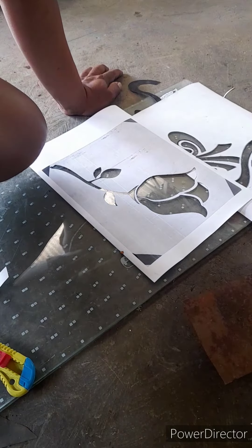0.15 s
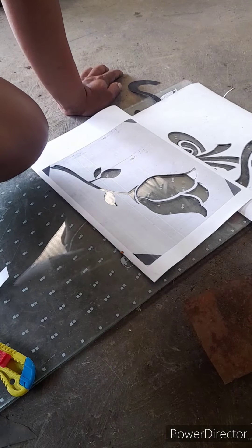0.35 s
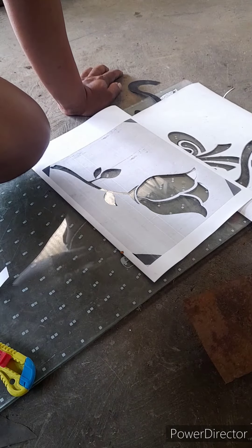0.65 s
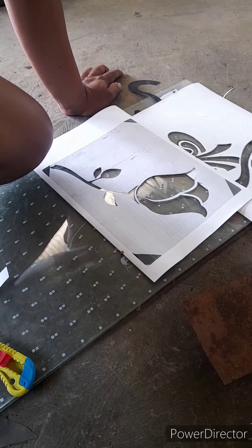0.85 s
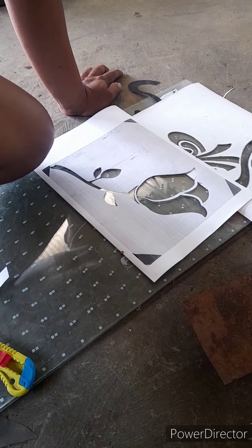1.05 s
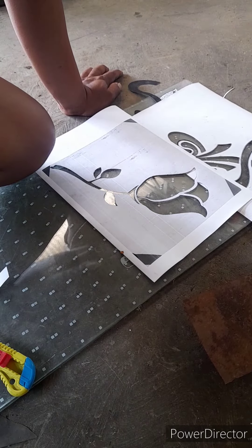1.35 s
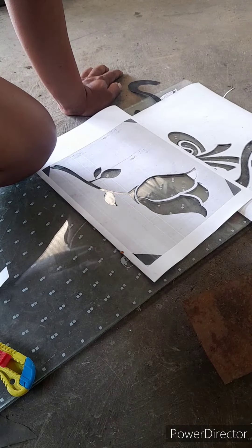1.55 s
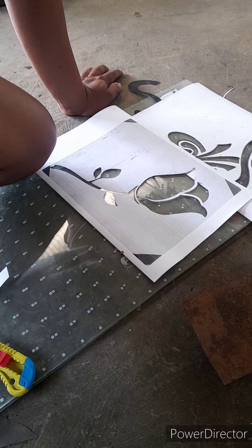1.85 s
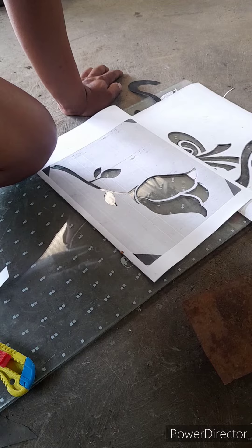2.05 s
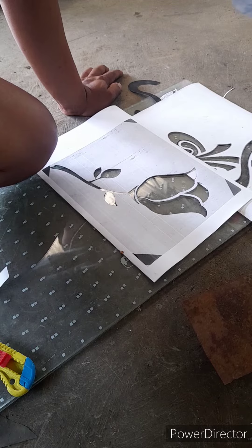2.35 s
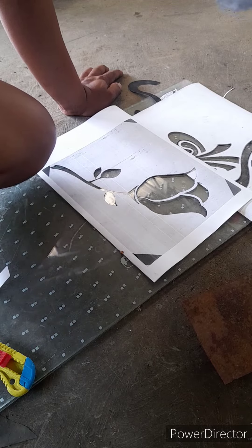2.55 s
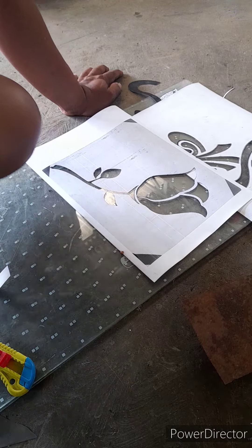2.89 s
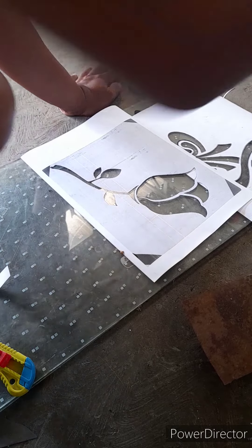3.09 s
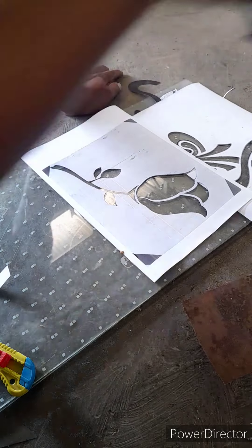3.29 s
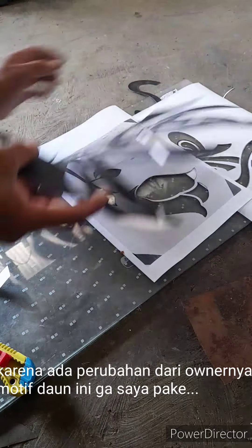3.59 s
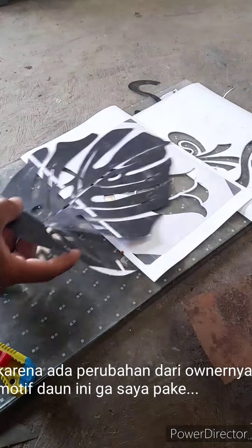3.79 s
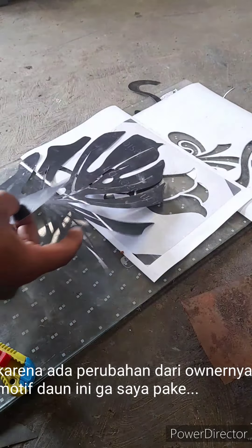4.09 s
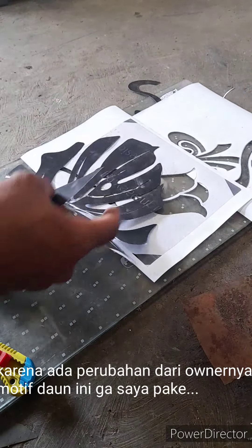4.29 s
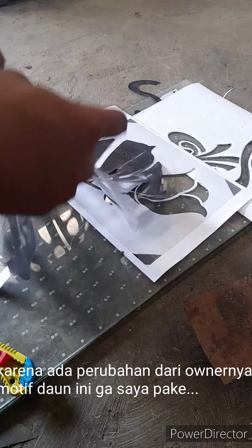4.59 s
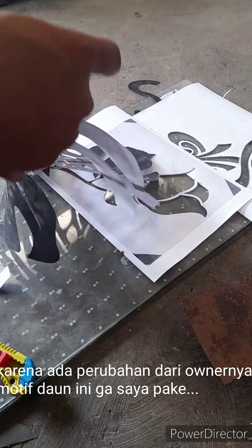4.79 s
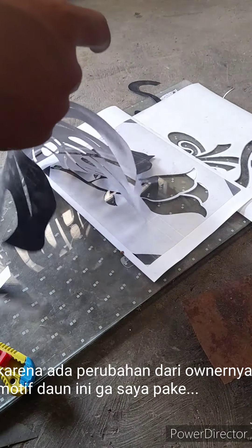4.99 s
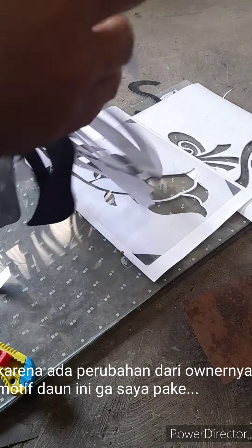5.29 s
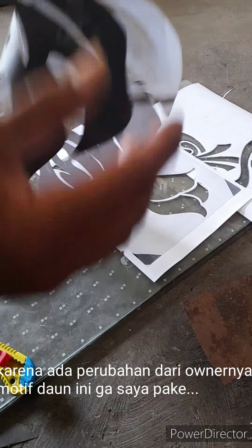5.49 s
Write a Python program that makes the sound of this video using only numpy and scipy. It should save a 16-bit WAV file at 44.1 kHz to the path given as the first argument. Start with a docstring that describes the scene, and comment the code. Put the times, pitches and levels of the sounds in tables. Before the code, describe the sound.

A small single-cylinder engine drones outside an open workshop, throbbing low with airy rush, valve chatter and faint dry squeaks. Close to the microphone, cloth and paper rub lightly; around three seconds a stiff cut-out sheet slides off in two firm scrapes. The engine then drops in pitch, fires unevenly and draws away, leaving soft paper flicks over a quiet low street background.

```python
"""First a single-cylinder engine putters outside an open workshop, then slows and fires unevenly as it
draws away: harmonics of the firing rate lifted by moving pipe resonances, with noisy rush and clatter.
Close by, someone crouching on the floor shifts, slides a cut paper stencil off a stack and waves it about:
friction noise hisses and crinkles, struck resonances tick. A quiet street of coloured noise lies behind."""
import sys
import numpy as np
from scipy import signal
from scipy.fft import rfft, irfft
from scipy.io import wavfile
from scipy.ndimage import map_coordinates

SR = 44100
rng = np.random.default_rng(int(sys.argv[2]) if len(sys.argv) > 2 else 0)


def wrap_up_sound(samples):
    """Save the sound to the file named by the first command line argument, as 16-bit audio."""
    columns = np.atleast_2d(samples).T
    # keep every value between -1 and 1, then stretch to whole-number steps
    tamed = np.clip(columns, -1, 1)
    steps = np.round(tamed * 32767).astype(np.int16)
    wavfile.write(sys.argv[1], SR, steps)


N = 248724
TIME = np.arange(N) / SR

# nearness of the machine, as the nominal level of its rush: [t/s, level/dB]
NEARNESS = [(0, -50), (.4, -45.5), (.8, -42.5), (1.3, -43.5), (1.8, -49), (3.1, -51), (3.9, -54),
            (5.64, -64.5)]


def engine():
    """Source superposition: periodic exhaust puffs, with rush and valve noise modulated at the firing rate."""
    rate, cycles, strength = crank(jitter_s=.0005, uneven_db=1.5, skip_db=1.2, first_s=0.00093)
    rush_db, = in_time(NEARNESS)
    puffs = strength * exhaust(rate, cycles, rush_db, ring_hz=161.64, ring_width_hz=103,
                               turn=1.35, scatter_hz=406)
    throb = np.cos(2 * np.pi * (cycles - .15))  # peaks 0.15 cycle after each firing
    rush = machine_rush(rush_db, throb) * pan(left_db=-0.3)
    gear = (valve_clatter(rush_db, throb) + squeaks(waver_hz=36)) * pan(left_db=-3.0)
    return workshop(puffs * pan(left_db=-2.2), wet_db=-24) + workshop(rush + gear, wet_db=-13.5)


# engine speed: [t/s, firing rate f/Hz]
FIRING = [(0, 28.24), (.35, 28.03), (.6, 27.45), (1, 27.38), (1.35, 27.66), (2.1, 27.42), (2.6, 27.79),
          (3.15, 27.7), (3.75, 25.85), (4.05, 25.1), (4.48, 23.2), (4.8, 23.03), (5.19, 24.57),
          (5.36, 22.64), (5.64, 23.36)]
# uneven running: [t/s, roughness 0-1]
ROUGH = [(0, .7), (.45, .5), (.8, .13), (3.1, .13), (3.6, .2), (4.1, .5), (4.8, .45), (5.1, .35),
         (5.64, .5)]


def crank(jitter_s, uneven_db, skip_db, first_s):
    """Phase is the integral of frequency; rough firings stray in time and alternate strong and weak."""
    (rate,), (rough,) = in_time(FIRING), in_time(ROUGH)
    cycles = np.cumsum(rate) / SR - first_s * rate[0]
    firing = np.arange(int(cycles[-1]) + 2)
    early, strong = rng.standard_normal((len(firing), 2)).T
    strength_db = uneven_db * strong + skip_db * (-1) ** firing
    cycles = cycles + rough * rate * jitter_s * np.interp(cycles, firing, early)
    return rate, cycles, from_db(rough * np.interp(cycles, firing, strength_db))


# limping, every second firing differs: [t/s, nominal power of half-order tones relative to the harmonics]
LIMP = [(0, .15), (.55, .15), (.75, 0), (4.2, 0), (4.45, 2), (4.6, 5), (4.92, 5), (5.02, .15), (5.64, .1)]
LIMP_WIDTH_HZ = 28.4  # reach of the limping either side of the drone
# body of the exhaust puff between the resonances: [f/Hz, harmonic level above the nominal rush/dB]
PUFF = [(52, -5.5), (80, -5), (110, -6), (190, -9), (250, -15), (280, -37), (380, -23), (450, -17),
        (550, -15.5), (640, -28), (715, -12), (850, -80)]
# how far the exhaust arrives by scattered paths rather than straight: [t/s, share 0-1]
INDIRECT = [(0, .6), (.55, .55), (.78, .08), (1.15, .1), (1.5, .15), (1.75, .55), (2.2, .45), (2.38, .15),
            (2.95, .12), (3.3, .35), (3.6, .4), (3.8, .25), (4.7, .25), (4.95, .55), (5.4, .35)]
# the beat comes early or late as straight and reflected paths trade places: [t/s, lag/s]
ARRIVAL = [(0, .002), (.7, .002), (1.1, .0005), (1.62, -.004), (1.8, -.019), (2.2, -.021), (2.4, -.0245),
           (2.7, -.0235), (3.0, -.028), (3.15, -.033), (3.35, -.05), (3.7, -.054), (4.15, -.045),
           (4.35, -.045), (4.6, -.053), (5.1, -.055), (5.64, -.053)]
FADE_DB, FADES_PER_S = 3, 4  # upper harmonics swell and fade as the paths change
FADE_FROM_HZ, SPREAD_HZ = 290, 485  # fading and left-right phase difference are full above these


def exhaust(rate, cycles, rush_db, ring_hz, ring_width_hz, turn, scatter_hz):
    """Fourier synthesis: firing-rate harmonics lifted by pipe resonances, whose lag makes each puff ring on."""
    orders = np.r_[2:31, 2.5:11][:, None]
    coarse = TIME[::64]  # slow curves are worked out every 64 samples
    hz = orders * rate[::64]
    halfway = orders % 1 > 0
    limp = np.interp(coarse, *np.transpose(LIMP)) * np.exp(-((hz - ring_hz) / LIMP_WIDTH_HZ) ** 2)
    present = np.where(halfway, limp, 1)
    power = present * from_db(at_hz(PUFF, hz) + rush_db[::64]) ** 2 + pipe_power(hz, present)
    fading = np.array([drift(FADES_PER_S)[::64] for _ in orders])
    fading *= np.minimum(hz / FADE_FROM_HZ, 1) ** 2
    heights = np.sqrt(2 * power) * from_db(FADE_DB * fading)
    # scattered paths put the harmonics out of step, the high ones most: the beat melts into a drone
    indirect = np.interp(coarse, *np.transpose(INDIRECT))
    scatter = np.minimum(indirect + (hz / scatter_hz) ** 4 + halfway, 1)
    lags = turn * np.arctan(2 * (hz - ring_hz) / ring_width_hz)
    lags += scatter * rng.uniform(-np.pi, np.pi, orders.shape)
    arrival = np.interp(coarse, *np.transpose(ARRIVAL))
    lags += 2 * np.pi * np.minimum(hz - ring_hz, ring_hz) * arrival
    # the higher a harmonic, the more its phase differs between the two sides
    apart = np.minimum((hz / SPREAD_HZ) ** 2, 1) * rng.choice([-1, 1], orders.shape) * np.pi / 4

    def tone(k, height, lag):
        phase = 2 * np.pi * k * cycles - np.interp(TIME, coarse, lag)
        return np.interp(TIME, coarse, height) * np.cos(phase)

    return np.array([sum(tone(*row) for row in zip(orders, heights, lags + side * apart))
                     for side in (1, -1)])


# four exhaust resonances move and swell as the engine travels, each: [t/s, centre f/Hz, level/dB]
RUMBLE = [(0, 105, -41), (.14, 84, -35), (.46, 110, -37), (.7, 99, -34), (1.05, 103, -28.5),
          (1.3, 110, -33.5), (1.7, 106, -33), (1.82, 94, -41), (1.96, 104, -35.5), (2.35, 110, -40),
          (2.8, 110, -34), (3.15, 94, -49), (3.68, 94, -45), (3.8, 86, -34), (3.93, 92, -35),
          (4.06, 86, -28.5), (4.16, 97, -31.5), (4.3, 87, -27), (4.42, 80, -39), (4.5, 88, -31),
          (4.86, 92, -32), (5.24, 100, -41), (5.32, 93, -35.5), (5.62, 93, -38)]  # deep, takes over off the throttle
DRONE = [(0, 149, -37), (.27, 162, -34.5), (.44, 143, -37), (.62, 138, -44), (1, 150.8, -25),
         (1.28, 149, -26.5), (1.48, 155, -21.5), (1.68, 162, -28), (1.86, 165, -26.5), (2.08, 161, -31),
         (2.2, 163, -37), (2.36, 168, -28.5), (2.56, 151, -31.5), (2.84, 161, -23.5), (3.1, 150, -27.5),
         (3.26, 138, -34), (3.42, 154.7, -27.5), (3.64, 151.7, -27.5), (3.75, 150, -32.5), (3.82, 164, -27),
         (4.1, 160, -29.5), (4.4, 158, -42), (4.6, 160, -35), (5.02, 157, -33.5), (5.3, 155, -39),
         (5.62, 146, -36.5)]  # main drone of the pipe
UPPER_BASS = [(0, 211.7, -43.5), (.5, 210, -44), (.8, 200, -30), (.92, 213, -29), (1.06, 219, -30),
              (1.22, 207.5, -40), (1.58, 216, -31.5), (1.9, 216, -45.5), (2.14, 195, -37.5),
              (2.24, 199, -42), (2.44, 205, -32.5), (2.58, 217, -42.5), (2.8, 206.2, -36),
              (3.05, 202, -41.5), (3.5, 207, -49), (3.7, 218, -36.5), (3.95, 225, -38), (4.1, 216, -49),
              (4.37, 206, -53), (4.45, 219, -38.5), (4.75, 203, -42), (5.62, 198.5, -46.5)]  # just above the drone
HUM = [(0.0, 328, -55.5), (0.16, 330, -47.5), (0.46, 304, -48), (0.84, 326, -54.9), (0.88, 299, -48.5),
       (1.14, 316, -50), (1.24, 307, -40), (1.96, 331, -51), (2.16, 303, -44), (2.42, 350, -42.5),
       (2.68, 317, -49.5), (3.3, 305, -51), (3.76, 306, -56), (5.62, 310, -69)]  # highest, faint
RUMBLE_WIDTH_HZ, DRONE_WIDTH_HZ, UPPER_BASS_WIDTH_HZ, HUM_WIDTH_HZ = 54, 37, 41, 63


def pipe_power(hz, present):
    """Additivity of power: four resonances each contribute to every tone."""
    return (resonance(hz, present, RUMBLE, RUMBLE_WIDTH_HZ)
            + resonance(hz, present, DRONE, DRONE_WIDTH_HZ)
            + resonance(hz, present, UPPER_BASS, UPPER_BASS_WIDTH_HZ)
            + resonance(hz, present, HUM, HUM_WIDTH_HZ))


def resonance(hz, present, curve, width_hz):
    """Selective resonance: a moving peak shares its power among the tones nearest to its centre."""
    centre_hz, db = (column[::64] for column in in_time(curve))
    lift = present / (1 + (2 * (hz - centre_hz) / width_hz) ** 2) ** 4
    return from_db(db) ** 2 * lift / lift.sum(axis=0)


# spectrum of the machine's rush: [f/Hz, relative level per Hz/dB]
RUSH = [(200, -6), (280, 3.5), (420, 4.5), (560, 2), (750, -0.5), (1000, -2), (1500, -5.5), (2600, -13),
        (4000, -17), (7000, -26.5), (15000, -48)]


def machine_rush(rush_db, throb):
    """Amplitude-modulated broadband noise: the rush throbs with each firing and drifts slowly."""
    noise = coloured(rng.standard_normal((2, N)), RUSH)
    return noise * from_db(rush_db + 1.22 + 0.26 * throb + drift(4.0))


# valve gear resonances: [f/Hz, width/Hz, relative level/dB]
VALVES = [(1610, 94, 0.5), (2023, 180, 7), (2255, 330, 15), (2600, 130, 4.5)]
# spells of louder chirring: [start t/s, strongest t/s, end t/s, level/dB]
CHIRRS = [(.08, .36, .56, -48), (.76, 1.0, 1.4, -49.5), (1.35, 1.55, 1.86, -53)]
CLATTER_DB = -11.5  # steady valve clatter, relative to the nominal rush


def valve_clatter(rush_db, throb):
    """Forced resonance: throbbing noise excites the damped modes of the valve gear."""
    knocks = rng.standard_normal((2, N)) * from_db(0.61 * throb)
    clatter = 0
    for hz, width_hz, db in VALVES:
        t60 = np.log(1000) / np.pi / width_hz
        clatter = clatter + from_db(db) * rms_one(ring(knocks, hz, t60)) * from_db(2.5 * drift(14))
    chirring = np.sqrt(from_db(rush_db + CLATTER_DB) ** 2 + swells(CHIRRS, shape=0.71))
    return patchy(clatter, patchy_db=3.0, width_hz=129.5, per_s=14) * chirring


# dry squeaks of the machine: [start t/s, end t/s, f/Hz, peak amplitude level/dB]
SQUEAKS = [(.172, .245, 2330, -49), (.174, .285, 1955, -54), (.19, .31, 2650, -55), (.325, .37, 2030, -51),
           (.388, .447, 2040, -45), (.44, .535, 2030, -49.5), (1.07, 1.21, 2062, -55),
           (1.546, 1.674, 1704, -53)]


def squeaks(waver_hz):
    """Frequency modulation: short wavering tones swell and fade."""
    waver = waver_hz * drift(110)
    total = 0
    for start, end, hz, db in SQUEAKS:
        swell = np.sin(np.pi * np.interp(TIME, [start, end], [0, 1]))
        total = total + from_db(db) * swell * np.sin(2 * np.pi * np.cumsum(hz + waver) / SR)
    return total


# where the paper is: [t/s, left minus right level/dB]
PAPER_SIDE = [(0, -.7), (2.8, -.8), (3.05, -4.8), (3.5, -4.8), (3.9, -.4), (5.64, 0)]
# firm slides of the sheet: [start t/s, end t/s, coarse voice nominal level/dB, hiss nominal level/dB]
SLIDES = [(2.977, 3.078, -50, -52.5), (3.036, 3.191, -39, -40), (3.317, 3.428, -39.5, -40),
          (3.37, 3.514, -36, -37.5), (5.005, 5.066, -53, -51.5)]


def paper():
    """Friction noise: light rubbing is a thin hiss; firm slides add the coarse voice of the whole sheet."""
    side_db, = in_time(PAPER_SIDE)
    coarse, hiss = sum(from_db([[coarse_db], [hiss_db]]) * pressure(start, end)
                       for start, end, coarse_db, hiss_db in SLIDES)
    sheet = rub(hiss) + slide(coarse) + whisk() + flexing(t60=0.009)
    return workshop(sheet * pan(side_db), wet_db=-24.0)


# light rubs of paper and cloth: [start t/s, strongest t/s, end t/s, nominal level/dB]
RUBS = [(.08, .3, 1.7, -59.5), (.35, .41, .48, -54.5), (.6, .98, 2.7, -57), (1.26, 1.31, 1.34, -47),
        (1.49, 1.56, 1.704, -48), (1.68, 1.78, 1.85, -63), (1.92, 1.96, 1.88, -47.5),
        (2.26, 2.55, 2.8, -57.5), (2.42, 2.62, 2.82, -51.5), (2.82, 2.87, 6.2, -61), (3.04, 3.2, 4, -57),
        (3.36, 3.62, 3.75, -46.5), (3.6, 4.23, 4.37, -55.5), (3.92, 3.965, 4, -54), (3.99, 4.05, 4.08, -54),
        (4.38, 4.56, 4.62, -59), (4.71, 4.79, 4.85, -58), (5.01, 5.04, 5.37, -56.5),
        (5.06, 5.14, 5.15, -50.5), (5.27, 5.36, 5.52, -49)]
# their spectrum: [f/Hz, relative level per Hz/dB]
RUB_COLOUR = [(700, -3.5), (1500, 1), (2300, -1), (3500, 3), (5500, 2.5), (7500, 2), (9000, -1),
              (12500, 3.5), (15500, -5.5)]
RESTING_RUB_DB = -70.5  # nominal level: hands and clothes are never quite still


def rub(hiss):
    """Light friction: fine fibre catches on a hiss, powers of rest, rubs and slides adding."""
    rubbing = np.sqrt(from_db(RESTING_RUB_DB) ** 2 + swells(RUBS, shape=1.08) + hiss ** 2)
    fine_grain = friction(per_s=1000, size_db=3, grain_db=-5.5)
    noise = patchy(coloured(fine_grain, RUB_COLOUR), patchy_db=2.0, width_hz=523, per_s=14)
    return noise * rubbing * from_db(1.83 + 2.1 * np.tanh(drift(26)))


# spectrum of the coarse voice: [f/Hz, relative level per Hz/dB]
SLIDE_COLOUR = [(400, -35), (800, -0.5), (1250, -1), (1900, 7), (2700, 2.5), (3800, 2), (6000, -4.5),
                (10000, -17), (15000, -7)]


def slide(coarse):
    """Stick-slip friction: coarse grain, its level fluctuating quickly as the sheet catches."""
    coarse_grain = friction(per_s=1300, size_db=2.5, grain_db=-1.5)
    catching = from_db(1.8 * np.tanh(drift(90)))
    noise = patchy(coloured(coarse_grain, SLIDE_COLOUR), patchy_db=4.0, width_hz=427, per_s=22)
    return noise * coarse * catching * from_db(1.0)


SLIDE_RISE, SLIDE_FALL = 0.46, 0.28  # shares of a slide spent pressing on and letting go


def pressure(start, end):
    """Friction follows normal force: the hand presses on, holds and lets go."""
    done = (TIME - start) / (end - start)
    return np.clip(np.minimum(done / SLIDE_RISE, (1 - done) / SLIDE_FALL), 0, 1) ** 1.03


# quick thin whisks of cloth: [start t/s, strongest t/s, end t/s, level/dB]
WHISKS = [(1.26, 1.31, 1.47, -52), (1.36, 1.44, 1.45, -53), (1.925, 1.962, 2.016, -42)]
# their spectrum: [f/Hz, relative level per Hz/dB]
WHISK_COLOUR = [(7000, -4), (10000, -7), (13000, 1), (15000, -3)]


def whisk():
    """Enveloped noise: high-pitched hiss in brief pointed swells."""
    return coloured(rng.standard_normal((2, N)), WHISK_COLOUR) * np.sqrt(swells(WHISKS, shape=2.2))


# the bending sheet resonates: [start t/s, strongest t/s, end t/s, f/Hz, level/dB]
FLEXES = [(1.27, 1.307, 1.36, 3300, -52), (1.52, 1.57, 1.65, 3500, -56), (1.54, 1.6, 1.66, 5500, -58),
          (2.95, 3.085, 3.17, 2300, -45), (3.04, 3.085, 3.175, 1800, -45), (3.11, 3.15, 3.17, 1900, -45),
          (3.35, 3.38, 3.42, 2350, -45), (3.39, 3.45, 3.49, 1900, -45), (3.39, 3.45, 3.49, 6000, -47),
          (5.11, 5.14, 5.17, 3900, -60), (5.14, 5.17, 5.21, 4600, -60), (5.375, 5.405, 5.43, 4450, -56),
          (5.33, 5.41, 5.445, 2210, -58)]


def flexing(t60):
    """Plate resonance: friction excites broad modes that change with the bend of the sheet."""
    grain = friction(per_s=400, size_db=2, grain_db=-3)
    return sum(rms_one(ring(grain, hz, t60)) * np.sqrt(swells([(*times, db)], shape=1))
               for *times, hz, db in FLEXES)


# paper ticks, levels before the common trims: [t/s, body level/dB, edge level/dB]
TICKS = [(0.3934, -49, -60), (1.2974, -51, -53), (1.5449, -51, -57), (1.7425, -62, -47), (1.956, -62, -53),
         (2.8085, -64, -49), (2.8529, -69, -45.5), (2.927, -55, -49), (3.152, -55, -43), (5.038, -54, -43),
         (5.423, -54, -58), (5.26, -63.5, -48.5), (5.463, -65, -48.5), (5.5046, -47.5, -47)]
# modes of the flexing sheet: [f/Hz, relative level/dB, t60/s]
SHEET = [(2270, 2, 0.018), (2620, -10, 0.021), (3150, -13, 0.006)]


def ticks(snap_s, body_db, edge_db):
    """Impulse response: a flicked edge gives a short bright snap and a brief ring of the sheet."""
    clicks, snaps = np.zeros(N), np.zeros(N)
    for s, body, edge in TICKS:
        clicks[round(s * SR)] = from_db(body + body_db)
        snaps[round(s * SR)] = from_db(edge + edge_db)
    fade = signal.lfilter([1], [1, -np.exp(-1 / (snap_s * SR))], snaps + 1e-18)
    flex = sum(from_db(db) * ring(clicks, hz, t60) for hz, db, t60 in SHEET)
    snap = fade * coloured(rng.standard_normal((2, N)), RUB_COLOUR)
    return (flex + snap) * pan(left_db=-7.5)


def friction(per_s, size_db, grain_db):
    """Stick-slip: fibres catch and let go, giving clicks of uneven size on a smooth hiss."""
    sizes = from_db(size_db * np.minimum(rng.exponential(1, N), 4))
    clicks = (rng.random(N) < per_s / SR) * sizes * rng.standard_normal((2, N))
    return rng.standard_normal((2, N)) + from_db(grain_db) * rms_one(clicks)


def workshop(x, wet_db, count=14):
    """Early reflection: floor, walls and roof return a few echoes, different at each side."""
    out = x.copy()
    for k, lag_s in enumerate(rng.uniform(.003, .028, count)):
        lag = int(lag_s * SR)
        out[k % 2, lag:] += from_db(wet_db) * (-1) ** (k // 2) * x[k % 2, :-lag]
    return out


# street background: [f/Hz, relative level per Hz/dB]
STREET = [(25, -14), (40, -23), (55, -4), (75, 4), (130, 3), (220, -5), (300, -13.5), (600, -22.5),
          (1250, -38.5), (1580, -28), (1850, -35.5), (3000, -38), (5000, -41), (6300, -36), (9000, -47.5),
          (15000, -40.5)]


def street():
    """Stationary coloured noise: a steady, mostly low background."""
    return from_db(-40.0) * coloured(rng.standard_normal((2, N)), STREET)


def from_db(db):
    """Level definition: decibels to amplitude gain."""
    return 10 ** (np.asarray(db) / 20)


def rms_one(x):
    """Normalisation: scale to unit mean power."""
    return x / np.sqrt(np.mean(x ** 2) + 1e-20)


def in_time(rows):
    """Linear interpolation: each column of a curve at every sample."""
    s, *columns = np.transpose(rows)
    return [np.interp(TIME, s, c) for c in columns]


def at_hz(points, hz):
    """Logarithmic interpolation: read a spectrum on a log-frequency axis."""
    f, value = np.transpose(points)
    return np.interp(np.log(hz), np.log(f), value)


def drift(rate):
    """Low-pass filtered noise: smooth chance with spread 1, made at every 40th sample."""
    r = np.exp(-80 * np.pi * rate / SR)
    noise = rng.standard_normal(N // 40 + 2002)
    slow = signal.lfilter([1], [1, -2 * r, r * r], noise)[2000:]  # the filter has settled
    return np.interp(np.arange(N) / 40, np.arange(len(slow)), rms_one(slow))


def swells(rows, shape):
    """Power summation: sounds each rise to a peak and fall away; a larger shape is more pointed."""
    return sum(from_db(db) ** 2 * np.sin(np.pi / 2 * np.interp(TIME, times, [0, 1, 0])) ** (2 * shape)
               for *times, db in rows)


def pan(left_db):
    """Interchannel level difference: gains of the two channels."""
    return from_db(left_db * np.array([[1], [-1]]) / 2)


# left-right likeness: [f/Hz, correlation]
LIKENESS = [(50, .92), (160, .94), (320, .55), (640, .25), (1400, -.15), (2300, .15), (3600, -.05),
            (6000, .15), (8500, .8), (15000, .85)]


def coloured(pair, spectrum):
    """Spectral shaping and mid-side coherence: two unrelated excitations become stereo of rms 1."""
    hz = np.maximum(np.arange(N // 2 + 1) * SR / N, 1)
    gain = from_db(at_hz(spectrum, hz)) / np.sqrt(1 + (spectrum[0][0] / hz) ** 4)  # rolls off below row one
    alike = np.clip(at_hz(LIKENESS, hz), -1, 1)
    mid, side = rfft(pair) * gain * np.sqrt([1 + alike, 1 - alike])
    return rms_one(irfft([mid + side, mid - side], N))


def ring(x, hz, t60):
    """Damped oscillator: a unit click sets a sine of height 1 ringing."""
    r, w = from_db(-60 / (t60 * SR)), 2 * np.pi * hz / SR
    return signal.lfilter([0, np.sin(w)], [1, -2 * r * np.cos(w), r * r], x + 1e-18)


def patchy(x, patchy_db, width_hz, per_s):
    """Time-varying spectrum: neighbouring bands swell and fade on their own, so the colour shifts."""
    hz, s, bins = signal.stft(x, SR, nperseg=512)
    places = np.meshgrid(hz / width_hz, s * per_s, indexing="ij")
    chance = map_coordinates(rng.standard_normal((256, 256)), places, mode="wrap")
    gain = from_db(patchy_db * np.clip(chance, -2, 2))
    return rms_one(signal.istft(bins * gain, SR)[1][:, :N])


def scene():
    """Linear superposition: engine and street outside, paper close to the microphone."""
    return engine() + paper() + ticks(snap_s=0.0047, body_db=8, edge_db=-1.0) + street()


CUTOFF_HZ = 15650


def record(dry):
    """Band limiting: an elliptic low-pass cuts the top steeply."""
    return signal.sosfilt(signal.ellip(12, .1, 80, CUTOFF_HZ, fs=SR, output="sos"), dry)


dry = scene()
out = record(dry)
wrap_up_sound(out)
```